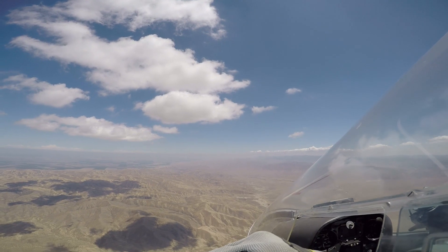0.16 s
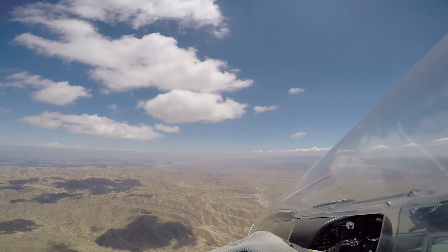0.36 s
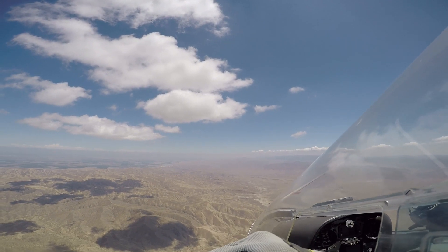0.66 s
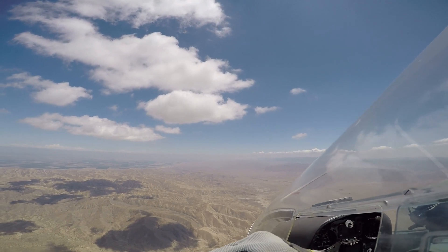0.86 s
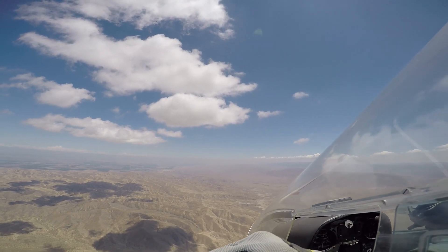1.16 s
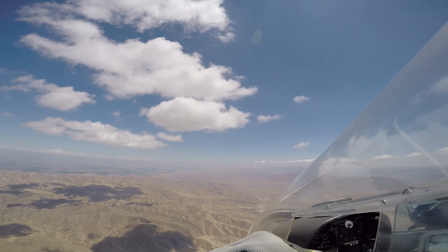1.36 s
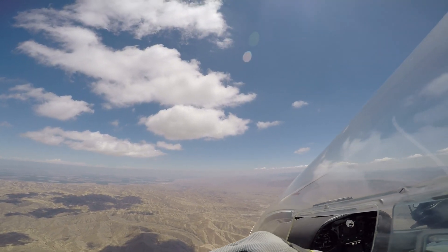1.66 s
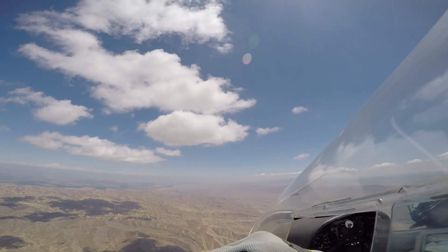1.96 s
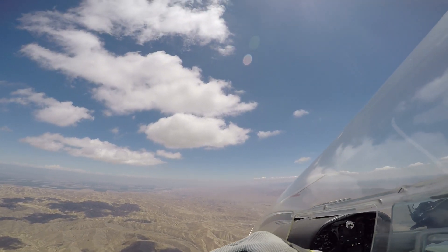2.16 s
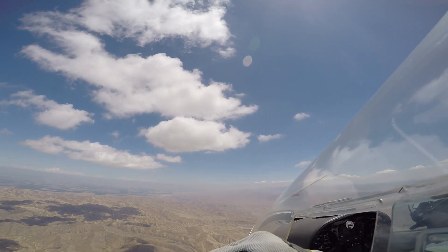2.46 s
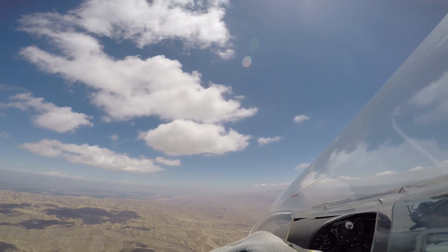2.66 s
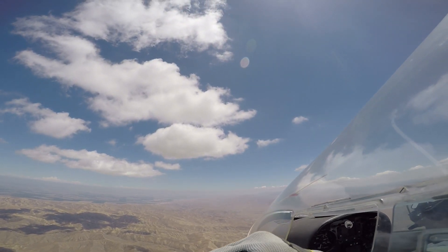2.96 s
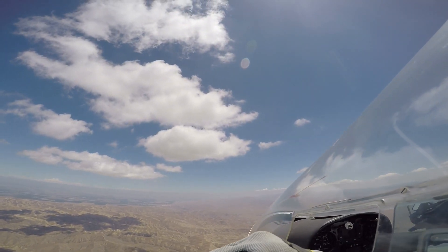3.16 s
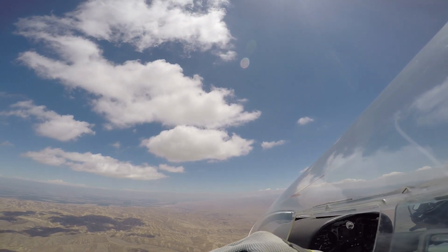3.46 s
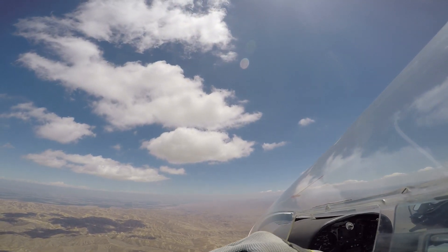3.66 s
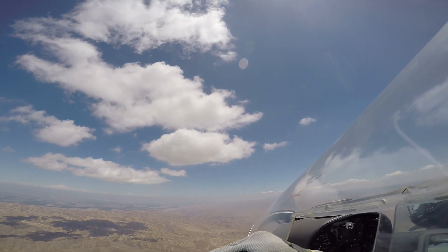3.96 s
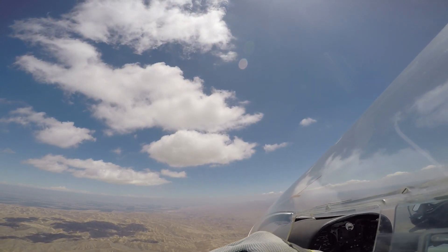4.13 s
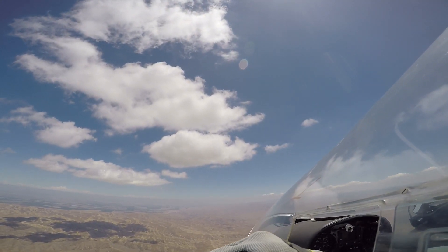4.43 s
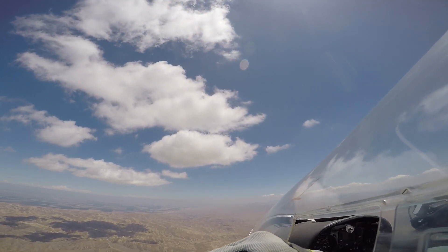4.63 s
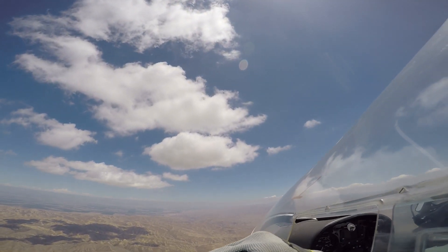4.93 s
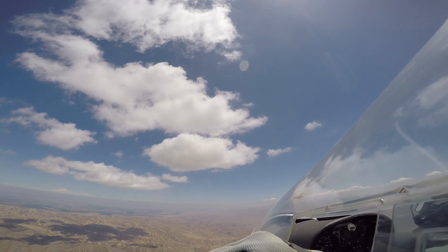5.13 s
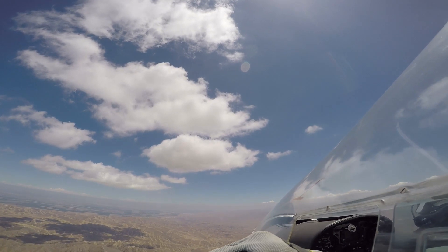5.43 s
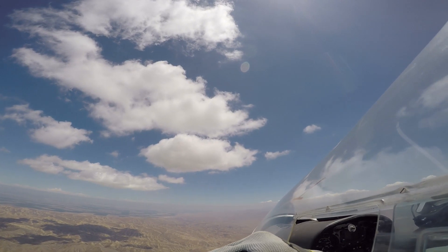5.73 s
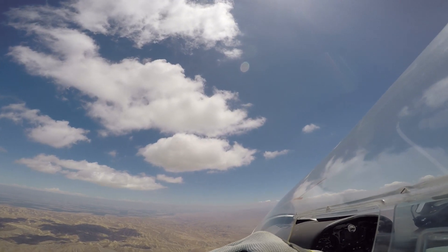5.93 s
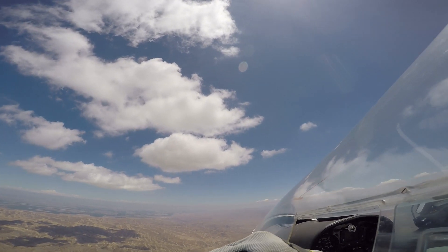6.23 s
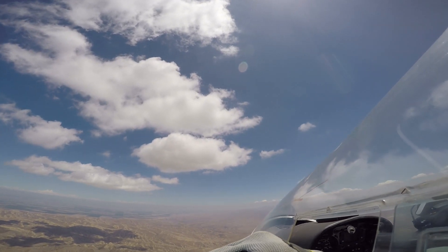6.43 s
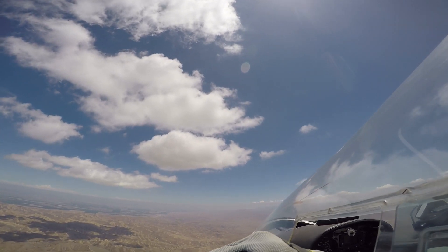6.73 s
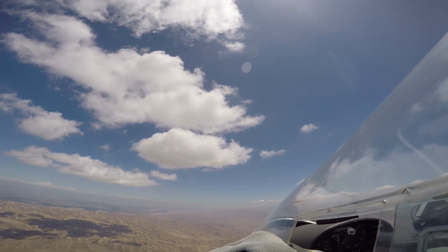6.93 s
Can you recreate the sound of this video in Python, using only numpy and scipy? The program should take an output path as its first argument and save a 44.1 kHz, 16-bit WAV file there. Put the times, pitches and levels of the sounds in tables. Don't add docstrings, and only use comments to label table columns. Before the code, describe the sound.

Loud, deep, steady rumble and roar of rushing air inside a glider cockpit, with short wind puffs buffeting the microphone and faint airy hiss.

```python
import sys
import numpy as np
from scipy import signal
from scipy.fft import rfft, irfft, next_fast_len
from scipy.io import wavfile
from scipy.ndimage import uniform_filter1d

SR = 44100
rng = np.random.default_rng(int(sys.argv[2]) if len(sys.argv) > 2 else 0)


def digitize_waveform(pressure):
    field = np.atleast_2d(pressure).T
    bounded = np.clip(field, -1, 1)
    quanta = np.round(bounded * 32767).astype(np.int16)
    wavfile.write(sys.argv[1], SR, quanta)


def level_to_linear(level):
    exponent = np.asarray(level, float) / 20
    return 10 ** exponent


N = 312531
WASH_DB = -32.5


# freq_hz [Hz], density_db [dB per Hz]
SHELL_SPECTRUM = [(10, -20), (20, -5), (35, 2.5), (64, 7.5), (80, 4), (110, 1.5), (160, -19), (400, -56),
                  (2000, -120)]


def shell_rumble(vent_db):
    rumble = evened(coloured(white_noise(), SHELL_SPECTRUM), span_s=0.15)
    return level_to_linear(-14 - 0.2 * vent_db) * rumble


# freq_hz [Hz], density_db [dB per Hz]
ROAR_SPECTRUM = [(50, -15), (90, -6), (130, 0), (200, -2), (300, -2.5), (400, -4.5), (520, -13),
                 (700, -25.5), (1500, -50.5), (4000, -110)]


def canopy_roar(speed_db, vent_db, eddies, swell):
    flicker_db = 1.7 * eddies + 1.0 * drift(rate_hz=15.5)
    excitation = white_noise() * level_to_linear(flicker_db) * (1 + 0.16 * swell)
    roar = evened(coloured(excitation, ROAR_SPECTRUM), span_s=0.1)
    level_db = -14 + 0.3 * speed_db + 0.28 * vent_db
    return level_to_linear(level_db) * roar


# start_s [s], peak_db [dB], length_s [s]
STRONG_EDDIES = [(0.218, -16.5, 0.0026), (0.48, -32, 0.0028), (0.702, -24, 0.0028), (0.769, -22, 0.0028),
                 (0.877, -19, 0.0035), (0.989, -19, 0.0028), (1.099, -19, 0.0031), (1.226, -19, 0.0028),
                 (1.257, -16.5, 0.0026), (1.392, -15, 0.0031), (1.417, -15, 0.0023), (1.463, -16, 0.0028),
                 (1.9, -20, 0.0035), (2.33, -14, 0.0026), (2.453, -30, 0.0028), (2.616, -15, 0.0029),
                 (2.843, -16, 0.0031), (3.181, -15.5, 0.003), (3.539, -20, 0.0022), (4.316, -21, 0.0028),
                 (4.5, -20, 0.0035), (4.655, -17, 0.0028), (4.759, -16, 0.0036), (4.972, -13.5, 0.0031),
                 (5.149, -8.5, 0.0021), (5.262, -14, 0.0028), (5.512, -16, 0.0033), (6.084, -19, 0.0031),
                 (6.221, -18, 0.0025), (6.479, -13.5, 0.0025)]


def strong_eddies():
    envelope = np.zeros(N)
    offset = np.arange(-2000, 2000)
    for start_s, peak_db, length_s in STRONG_EDDIES:
        centre = round((start_s + length_s) * SR)
        at = np.clip(centre + offset, 0, N - 1)
        envelope[at] += level_to_linear(peak_db) * np.exp(-0.5 * (offset / SR / length_s) ** 2)
    return envelope


def small_eddies(per_s, length_s, spread_db):
    strength = level_to_linear(spread_db * np.minimum(rng.exponential(1, N), 3))
    born = (rng.random(N) < per_s / SR) * strength
    t_s = np.arange(-400, 400) / SR
    return signal.fftconvolve(born, np.exp(-0.5 * (t_s / length_s) ** 2), "same")


# freq_hz [Hz], density_db [dB per Hz]
PUFF_SPECTRUM = [(200, -4), (450, 7.5), (900, 0), (1500, -6.5), (2200, -11), (3100, -14.5), (4000, -26),
                 (8000, -37), (20000, -75)]


def vent_puffs(vent_db, strong):
    small = small_eddies(per_s=70.0, length_s=0.0019, spread_db=1.56)
    gusts = strong + level_to_linear(WASH_DB + vent_db + 7.5) * small
    gust_rms = np.sqrt(np.mean(gusts ** 2))
    return level_to_linear(-8.0) * gust_rms * coloured(white_noise() * gusts, PUFF_SPECTRUM)


def microphone_slaps():
    start_s, peak_db, length_s = np.transpose(STRONG_EDDIES)
    at = ((start_s + length_s) * SR).astype(int)
    pulses = np.zeros(N)
    pulses[at] = level_to_linear(peak_db - peak_db.max()) * rng.choice([-1, 1], len(at))
    slaps = coloured(pulses, PUFF_SPECTRUM)
    return level_to_linear(peak_db.max() - 6.0) * slaps / np.abs(slaps).max()


# freq_hz [Hz], density_db [dB per Hz]
WASH_SPECTRUM = [(200, 1.5), (400, 2.5), (700, -1), (1000, -4.5), (1500, -12.5), (2200, -26), (3500, -37),
                 (8000, -71), (20000, -82)]


def vent_wash(vent_db, eddies, swell):
    flicker_db = 3.0 * eddies + 0.95 * drift(rate_hz=14.0)
    excitation = white_noise() * level_to_linear(flicker_db) * (1 + 0.058 * swell)
    return level_to_linear(WASH_DB + vent_db + 2.5) * coloured(excitation, WASH_SPECTRUM)


# freq_hz [Hz], density_db [dB per Hz]
HISS_SPECTRUM = [(500, -14), (1200, -5), (2200, -1.5), (3800, -6), (6000, -10), (8200, -17.5),
                 (10600, -19.5), (11400, -21.5), (13600, -22.5), (15200, -28), (20000, -40)]
# freq_hz [Hz], width_hz [Hz], peak_db [dB]
SEAL_RESONANCES = [(3005, 600, 4.5), (4970, 1060, 6.5), (7070, 1000, 1.5), (9070, 500, 3.5),
                   (10060, 1000, 3.5)]


def seal_hiss(speed_db, eddies, swell):
    flicker_db = 0.14 * eddies + 0.49 * drift(rate_hz=36)
    excitation = white_noise() * level_to_linear(flicker_db) * (1 + 0.009 * swell)
    return level_to_linear(-38 + speed_db) * coloured(excitation, HISS_SPECTRUM, SEAL_RESONANCES)


# time_s [s], speed_db [dB airspeed], vent_db [dB vent turbulence]
AIRFLOW = [(0, -.8, -4), (.7, -.4, -2.5), (1.1, 0.9, -1), (1.7, -0.9, -1), (2.2, -.6, 2.2), (2.8, -1, -0.3),
           (3.3, .7, .2), (3.85, .9, 1.5), (4.2, -0.5, -.6), (4.6, 0.9, 2.5), (5.05, 0.4, 0.3),
           (5.35, -0.3, 0.2), (5.9, 1.3, 3.1), (6.4, -1, 0), (6.8, -0.5, 0), (7.08, -1.5, 2)]


def airflow():
    time_s, speed_db, vent_db = np.transpose(AIRFLOW)
    t_s = np.arange(N) / SR
    return np.interp(t_s, time_s, speed_db), np.interp(t_s, time_s, vent_db)


def drift(rate_hz):
    r = np.exp(-2 * np.pi * rate_hz / SR)
    noise = rng.standard_normal(N + SR)
    return rms_one(signal.lfilter([1], [1, -2 * r, r * r], noise)[SR:])


def evened(x, span_s):
    span = int(span_s * SR)
    power = uniform_filter1d(uniform_filter1d(x ** 2, span), span)
    steadying = 0.79
    return rms_one(x / (power + 1e-3) ** (steadying / 2))


def coloured(excitation, spectrum, peaks=()):
    size = next_fast_len(N)
    hz = np.arange(size // 2 + 1) * SR / size + 1e-3
    freq_hz, density_db = np.transpose(spectrum)
    shape_db = np.interp(np.log(hz), np.log(freq_hz), density_db)
    for peak_hz, width_hz, peak_db in peaks:
        shape_db += peak_db / (1 + (2 * (hz - peak_hz) / width_hz) ** 2)
    return rms_one(irfft(rfft(excitation, size) * level_to_linear(shape_db), size)[:N])


def white_noise():
    return rng.standard_normal(N)


def rms_one(x):
    return x / np.sqrt(np.mean(x ** 2) + 1e-20)


def scene():
    speed_db, vent_db = airflow()
    eddies = 0.56 * drift(rate_hz=22.0) + 0.79 * drift(rate_hz=80)
    strong = strong_eddies()
    swell = strong / level_to_linear(WASH_DB)
    mix = shell_rumble(vent_db)
    mix = mix + canopy_roar(speed_db, vent_db, eddies, swell)
    mix = mix + vent_puffs(vent_db, strong) + microphone_slaps()
    mix = mix + vent_wash(vent_db, eddies, swell)
    mix = mix + seal_hiss(speed_db, eddies, swell)
    return mix[None]


def low_pass(x):
    return signal.sosfilt(signal.butter(12, 15330, fs=SR, output="sos"), x)


def record(dry):
    ceiling, knee = 0.96, 9.0
    bent = dry / (1 + np.abs(dry / ceiling) ** knee) ** (1 / knee)
    return low_pass(bent)


dry = scene()
out = record(dry)
digitize_waveform(out)
```